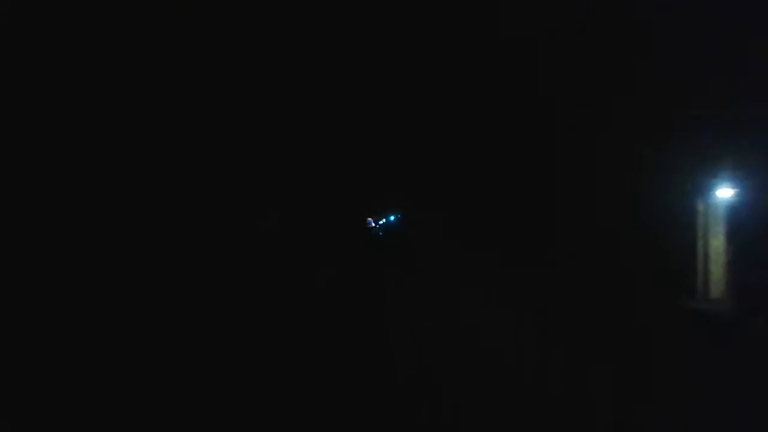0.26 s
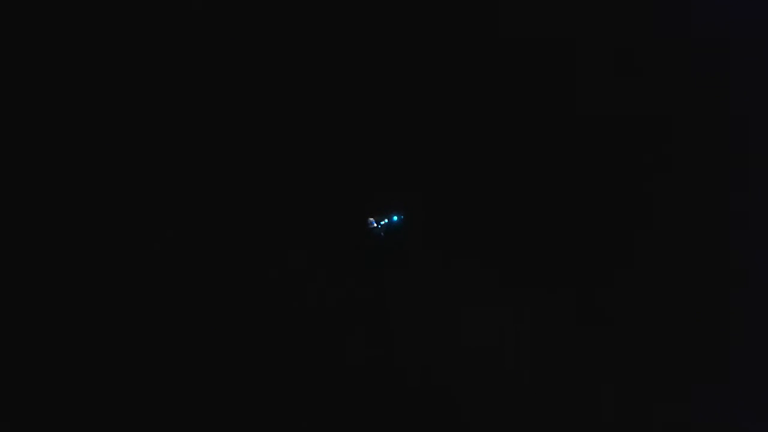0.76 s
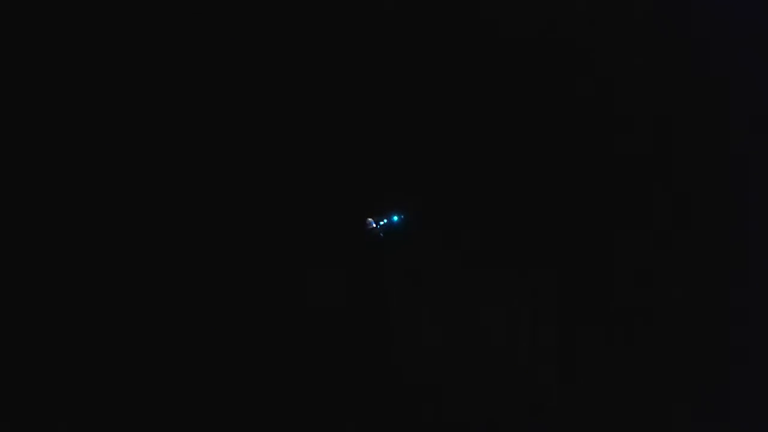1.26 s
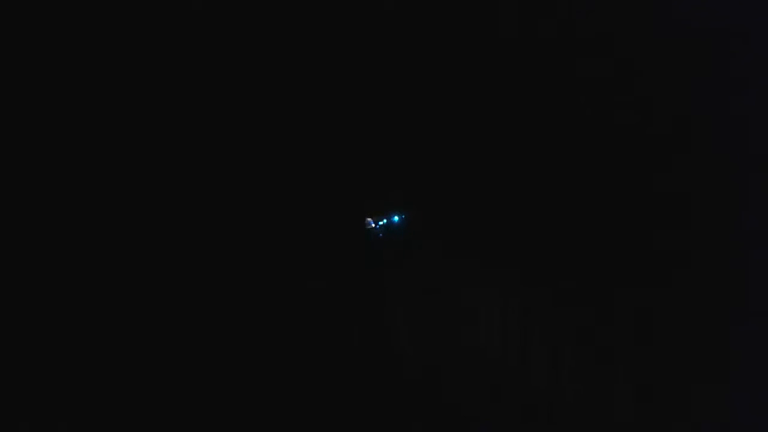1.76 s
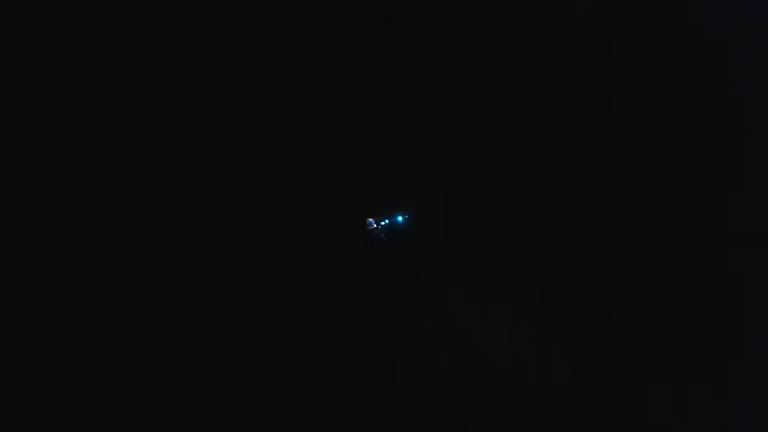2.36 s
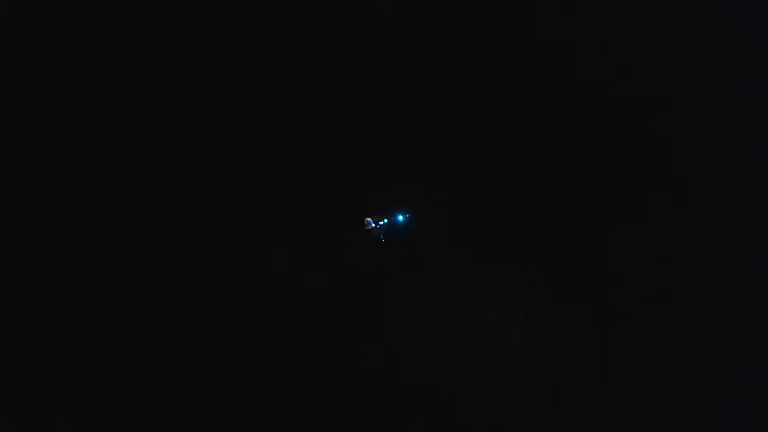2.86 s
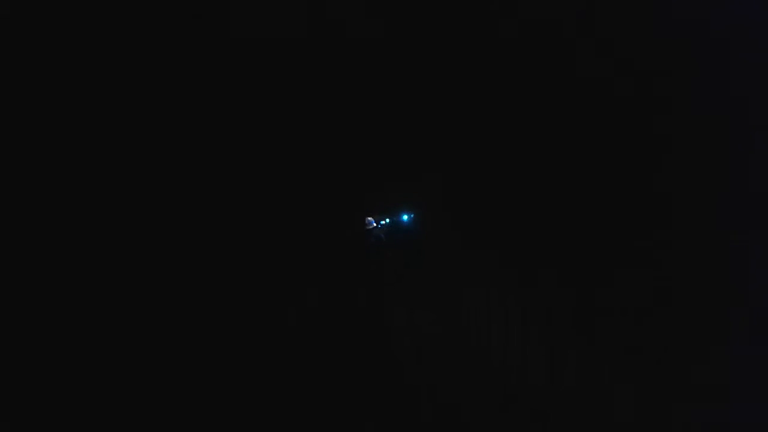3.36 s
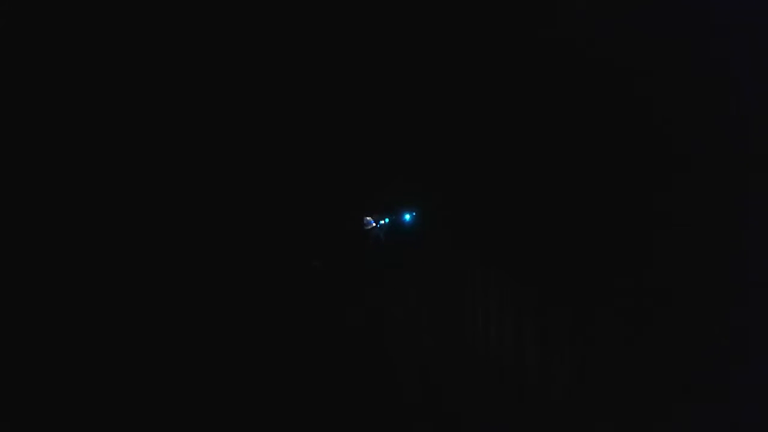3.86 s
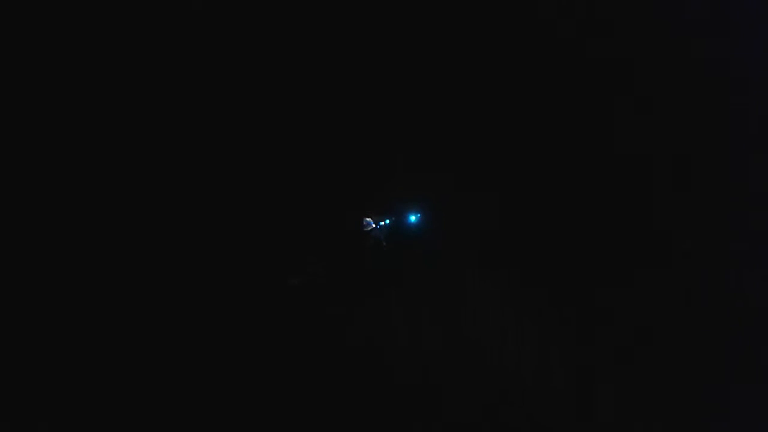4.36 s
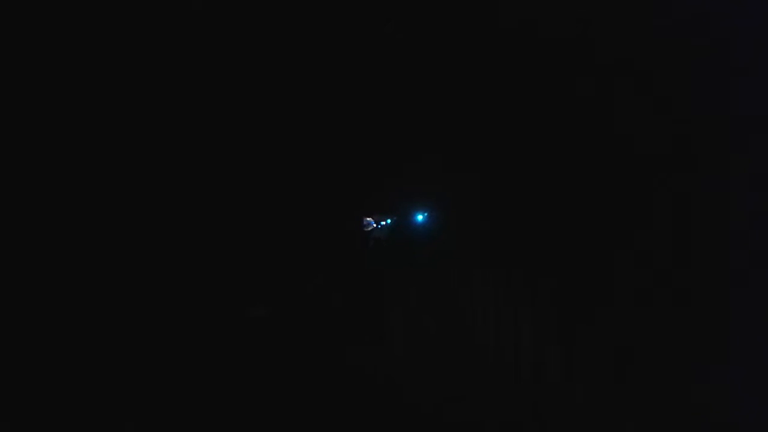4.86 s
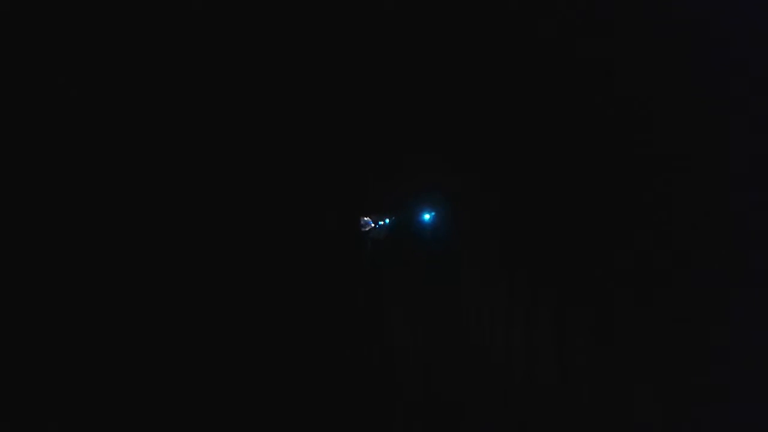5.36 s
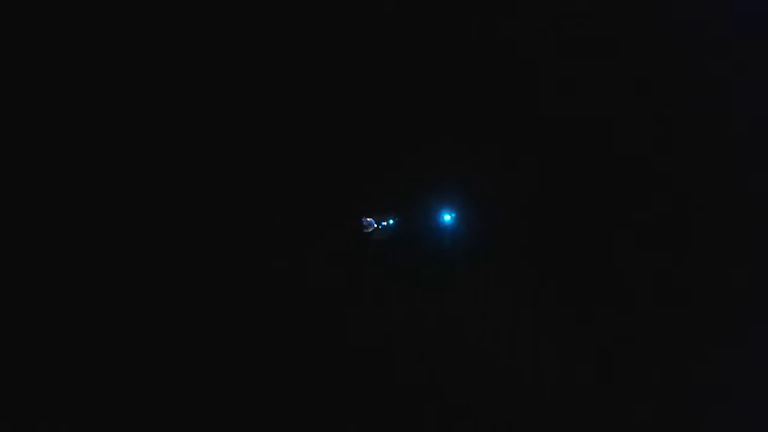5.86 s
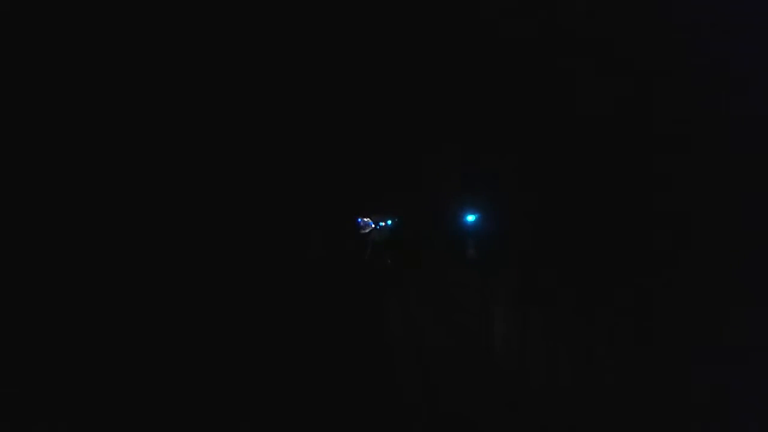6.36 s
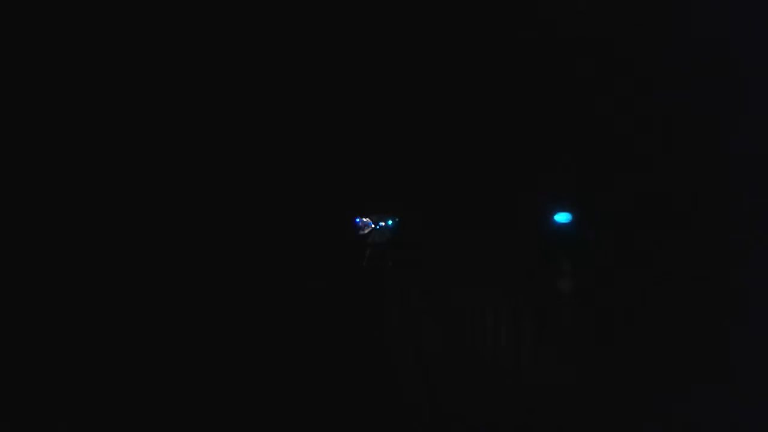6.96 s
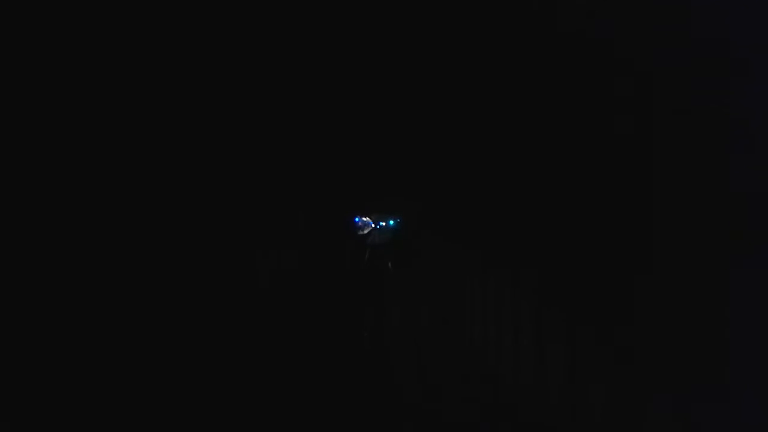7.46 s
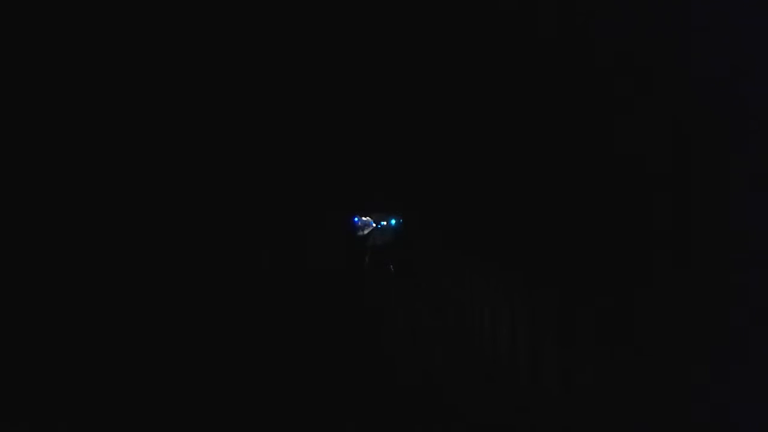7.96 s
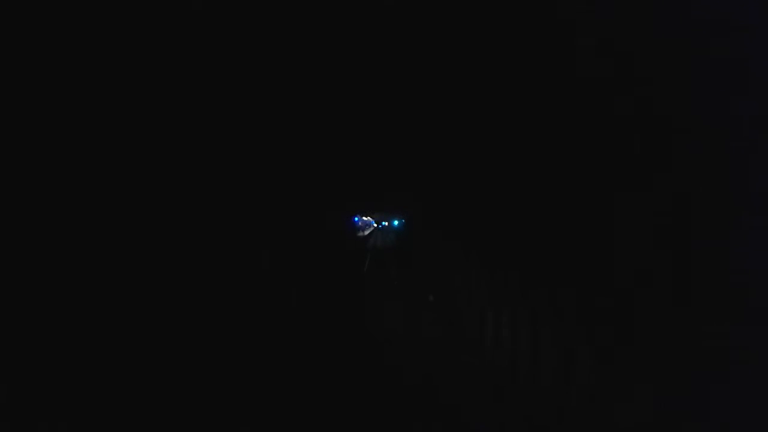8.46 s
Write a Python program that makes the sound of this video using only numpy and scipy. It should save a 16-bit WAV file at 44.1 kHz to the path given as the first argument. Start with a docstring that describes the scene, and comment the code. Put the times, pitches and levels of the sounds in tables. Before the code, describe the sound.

A subway car runs through a tunnel for nearly nine seconds, heard from inside. A loud, steady mix of low floor boom, body rumble and wheel roar fills the whole stretch, with irregular rail joint knocks and dull thuds. Much quieter, the power shoe hisses and crackles on the live rail, and a thin, high motor whine settles within the first second, when a fitting gives a tiny squeak. Just after 2 seconds the shoe spits in a few sharp clicks. Near 3.3 seconds a hollow panel gives a short bong, followed by more knocks. The wheels knock hardest between 4.5 and 5.5 seconds. Loose metal clinks lightly near 6.3 seconds, and the floor booms near 7.3. More knocks and spits cluster around 8 seconds, while the rumble carries on to the end.

```python
"""Inside a subway car in a tunnel. From the start, rough rails make the floor boom, the body rumble and
the wheels roar, while the shoe that picks up power hisses on the live rail. The drive's whine settles
in the first second, as a fitting squeaks. Just after 2 s the shoe spits hard; near 3.3 s a hollow panel
bongs. Wheels knock over rail joints all along, hardest around 5 s. Loose metal clinks near 6.3 s, the
floor booms near 7.3 s, and more knocks and spits come around 8 s."""
import sys
import numpy as np
from scipy import signal
from scipy.fft import rfft, irfft, next_fast_len
from scipy.io import wavfile
from scipy.ndimage import uniform_filter1d

SR = 44100
rng = np.random.default_rng(int(sys.argv[2]) if len(sys.argv) > 2 else 0)


def wav_out(sig):
    """Save sig, one row per channel (or a flat mono array), as 16-bit PCM at SR to the path in sys.argv[1]."""
    wavfile.write(sys.argv[1], SR, np.round(np.clip(np.atleast_2d(sig).T, -1, 1) * 32767).astype(np.int16))


N = 384111

# How loud the ride is: t/s, then level/dB of floor boom, body drone, panel rumble, wheel roar
RIDE_LEVELS = [(0.0, -53, -26, -21, -19.5), (0.07, -16, -14.5, -19.5, -27.5), (0.19, -41, -22, -28.5, -26),
               (0.29, -24, -22.5, -23.5, -26), (0.63, -20.5, -13.5, -16.5, -20.5),
               (1.19, -26, -18.5, -18.5, -21), (1.75, -21.5, -16, -18, -21),
               (2.33, -22.5, -14.5, -19, -20.5), (2.6, -24, -21, -21, -23.5), (3.05, -22, -16, -21, -23),
               (3.25, -20, -19, -20.5, -22.5), (3.42, -27, -19, -17, -20), (4.07, -20, -18.5, -21, -23),
               (5.34, -21.5, -17.5, -16.5, -20), (6.18, -21, -17.5, -17, -20), (6.72, -18, -13.5, -14, -19),
               (6.89, -16.5, -20, -17.5, -22), (7.25, -25.5, -15.5, -17.5, -20.5),
               (7.28, -11, -12, -22.5, -22.5), (7.35, -22.5, -19, -15, -23), (7.71, -17, -15, -16, -21),
               (8.66, -19.5, -17.5, -16.5, -21), (8.71, -32, -25, -12.5, -21.5)]
# Their colours (how strong each pitch is, from low to high): f/Hz, level/dB
BOOM_COLOUR = [(18, -40), (30, -26), (54, 6), (90, 0.5), (120, -10), (200, -120)]
DRONE_COLOUR = [(53, -32), (90, -4.5), (135, 1.5), (200, -2.5), (260, -22), (440, -120)]
RUMBLE_COLOUR = [(120, -35), (200, -1.5), (274, -0.5), (307, -3), (382, -4), (421, -11.5), (476, -7.5),
                 (500, -12), (650, -67), (1100, -120)]
ROAR_COLOUR = [(260, -20.5), (450, -1.5), (541, -4), (809, -4.5), (1090, -11.5), (1310, -13.5),
               (1690, -22.5), (2600, -32), (3380, -72), (5720, -120)]

def rolling(bumps):
    """Rough rails shake the floor, the body, the panels and the wheels."""
    boom_db, drone_db, rumble_db, roar_db = over_time(RIDE_LEVELS)
    boom = undb(boom_db) * flutter(BOOM_COLOUR, bumps, bump_db=.1, own_db=.73, rate=4.2, grain_db=.1)
    drone = undb(drone_db) * flutter(DRONE_COLOUR, bumps, bump_db=.21, own_db=.57, rate=4.4, grain_db=.13)
    rumble = undb(rumble_db) * flutter(RUMBLE_COLOUR, bumps, bump_db=1, own_db=.68, rate=12, grain_db=.3)
    roar = undb(roar_db) * flutter(ROAR_COLOUR, bumps, bump_db=.7, own_db=.73, rate=16, grain_db=.84)
    return boom + drone + lull() * (rumble + roar + ringing(rumble_db, roar_db))


# The notes of a panel, the rail and the body: f/Hz, width/Hz
RING_NOTES = [(385, 20.5), (1370, 145), (2000, 210)]

def ringing(rumble_db, roar_db):
    """A panel, the rail and the body ring along with the ride, most of all after a knock."""
    fade_s = 0.43  # every fade time is the time to fall by 60 dB
    struck = signal.lfilter([1], [1, -undb(-60 / (fade_s * SR))], knock_spikes())
    struck = uniform_filter1d(struck, size=441)  # soften each start
    steady_db = (rumble_db - 12, roar_db - 22, roar_db - 23)
    struck_db = (-22.5, -31.5, -35)  # after a knock of 0 dB
    out = 0
    for db, knock_db, note in zip(steady_db, struck_db, RING_NOTES):
        strength = undb(db + 2 * wander(7.6)) + undb(knock_db) * struck
        out += strength * narrow_noise(*note)
    return out


# Knocks at rail joints: t/s, level/dB, brightness/(dB per octave)
JOINT_KNOCKS = [(0.179, -8.5, -6), (0.248, -15, -7), (0.414, -14.5, 8), (1.055, -20, -3), (1.27, -14, 7),
                (1.485, -9, 2), (1.567, -17, 1), (1.682, -10.5, 7), (2.211, -8, 9), (2.249, -16, 12),
                (2.416, -9, 4.5), (2.816, -8.5, -5), (3.243, -13, 0), (3.419, -11, -4), (3.452, -15, 3),
                (3.535, -8, -2), (3.599, -15, -3), (4.51, -7.5, -9), (4.545, -4.5, -6), (4.58, -11, -3),
                (4.676, -9, -10), (4.922, -18, -3), (4.972, -3, -5), (5.035, -9.5, 7.5), (5.169, -6, -4),
                (5.404, -4, 2), (5.589, -8.5, -6), (5.647, -15, 0), (5.839, -13.5, 4), (6.279, -19, 6),
                (6.475, -10.5, 2), (7.548, -7, -5), (7.98, -8, -5), (8.184, -10.5, -7), (8.24, -11, -1)]
# The colour of a knock: f/Hz, level/dB
KNOCK_COLOUR = [(300, -2), (500, 5.5), (750, 7.5), (1000, 3), (1400, -4.5), (2200, -21), (4000, -47),
                (6000, -70)]

def knocks():
    """A wheel hits a rail end with a short ping, and the knock rings on in the body and the tunnel."""
    hits = [(s, db, 0.77, tilt_db) for s, db, tilt_db in JOINT_KNOCKS]  # 0.77 s fade
    clatter = bursts(hits, KNOCK_COLOUR, rise_s=0.0012, crest_db=13, snap=0.35)
    t = np.arange(SR // 50) / SR
    ping = undb(-4.5) * np.exp(-t / 0.0047) * np.sin(2 * np.pi * 720 * t)
    return clatter + signal.fftconvolve(knock_spikes(), ping)[:N]


def knock_spikes():
    """One spike for each knock, as tall as the knock is strong."""
    spikes = np.zeros(N)
    for s, db, _ in JOINT_KNOCKS:
        spikes[int(s * SR)] = undb(db)
    return spikes


def lull(depth_db=-2.5, lead_s=0.13):
    """Weight comes off a wheel as it nears a joint: the volume sags, more before a harder knock."""
    ramp = np.linspace(0, 1, int(lead_s * SR))
    nearness = signal.fftconvolve(knock_spikes(), ramp)[len(ramp) - 1:]
    return undb(depth_db * nearness)


# Thuds of the wheel frame: t/s, level/dB, brightness/(dB per octave)
FRAME_THUDS = [(0.071, -10, 3.5), (0.545, -5, -2), (0.68, -9, -4), (1.028, -0.5, -1.5), (1.429, -0.5, -9),
               (3.264, -0.5, 2), (3.318, -6.5, 1), (3.5, -6, 4), (4.149, -3.5, 5.5), (4.374, -3, -2),
               (4.62, -4, 3), (5.404, -4, 4), (5.843, -7, 4), (6.45, -5, 0), (6.72, -3.5, -9),
               (7.28, -8, -2), (8, -8, 4), (8.329, -6.5, -7)]
# The colour of a thud: f/Hz, level/dB
THUD_COLOUR = [(60, -19), (130, 7), (250, 0.5), (420, -9.5), (700, -23), (1200, -88)]

def thuds():
    """The frame that holds the wheels bumps into the car body, which rings on."""
    hits = [(s, db, 0.57, tilt_db) for s, db, tilt_db in FRAME_THUDS]  # 0.57 s fade
    return bursts(hits, THUD_COLOUR, rise_s=0.0032, crest_db=8.5, snap=0.5)


# How loud the shoe is: t/s, scrape level/dB, sizzle level/dB
SHOE_LEVELS = [(0.0, -45.5, -42), (0.58, -40.5, -39.5), (1.16, -41.5, -38.5), (2.25, -38.5, -35.5),
               (2.6, -44, -39), (3.27, -42, -38), (3.49, -40, -36.5), (4.0, -42.5, -39), (4.34, -42.5, -38),
               (4.75, -40, -37.5), (5.31, -41.5, -37), (5.6, -35.5, -35.5), (6.11, -41, -38.5),
               (6.53, -37.5, -36), (6.84, -41.5, -40), (8.03, -42, -40), (8.2, -38.5, -38.5),
               (8.71, -40.5, -37.5)]
# When it spits: t/s, level/dB, fade/s, brightness/(dB per octave)
SHOE_SPITS = [(.635, -28, .4, 2), (.675, -27, 0.32, -2), (.79, -29, .3, 1), (.829, -24, .1, 4),
              (.912, -27, .15, 0), (1.15, -25.5, .25, 0), (1.33, -19.5, 0.22, -7), (1.478, -25, 0.21, -2),
              (1.566, -24, 0.31, -6), (1.69, -20, .15, 0), (2.028, -26, 0.3, 10), (2.057, -16.5, 0.18, 4),
              (2.094, -20, 0.13, 2), (2.203, -13, 0.34, 9), (2.23, -15, 0.23, 2), (2.265, -21, 0.33, 0),
              (2.308, -20, .12, -1), (2.405, -24, 0.35, 1), (3.29, -24, .2, -2), (3.36, -23, .22, 8),
              (3.39, -26, 0.27, 7), (3.435, -21.5, .5, -6.5), (3.475, -25, 0.46, -4),
              (3.525, -25, 0.46, -4), (3.6, -25, 0.45, -6), (4.545, -24, 0.33, 2), (4.56, -16, .3, -11),
              (4.975, -29, 0.6, 2), (5.16, -21, 0.18, -7), (5.405, -20.5, 0.44, -1), (5.836, -23, 0.12, 8),
              (6.274, -28, .22, -14), (6.398, -23.5, .1, -2), (6.545, -25, .15, -3),
              (7.55, -26.5, 0.23, -1), (7.98, -29, .26, 11), (8.04, -25, 0.5, -3), (8.125, -24, .35, -4),
              (8.204, -24.5, 0.4, -2), (8.245, -24, 0.32, -6), (8.285, -23, .2, -9), (8.63, -22, 0.13, 2)]
# The colours of its three sounds: f/Hz, level/dB
SCRAPE_COLOUR = [(1530, -17), (2600, -1.5), (2890, -2), (3090, -3), (4570, -6.5), (6000, -6), (7800, -23),
                 (13200, -120)]
SIZZLE_COLOUR = [(4500, -15), (6000, -7), (6800, 2), (7800, 4), (8800, -1.5), (10600, -4.5), (11100, -10.5),
                 (11600, -44), (13000, -90)]
SPIT_COLOUR = [(880, 0), (1500, -5.5), (3190, -5.5), (3860, -4), (5580, -6), (7800, 2), (11700, -12.5),
               (15200, -45), (22000, -120)]

def shoe(bumps):
    """The power shoe scrapes, sizzles and spits as it slides along the live rail."""
    scrape_db, sizzle_db = over_time(SHOE_LEVELS)
    scrape = flutter(SCRAPE_COLOUR, bumps, bump_db=1.23, own_db=.88, rate=15, grain_db=.99)
    sizzle = flutter(SIZZLE_COLOUR, bumps, bump_db=1.15, own_db=.94, rate=18, grain_db=.97)
    spits = bursts(SHOE_SPITS, SPIT_COLOUR, rise_s=0.012, crest_db=7)
    return lull() * undb(scrape_db) * scrape + undb(sizzle_db) * sizzle + spits


# Squeaks of a fitting and bongs of a panel: t/s, level/dB, f/Hz, swell time/s
FITTING_SQUEAKS = [(.880, -25, 9100, 0.004), (.896, -35, 9250, .004), (.906, -34, 9000, .008)]
PANEL_BONGS = [(0.545, -10, 150, .012), (0.585, -9.5, 135, .02), (1.448, -10, 165, .018),
               (1.545, -12, 169, .012), (1.06, -15.5, 290, 0.048), (3.278, -2, 259, 0.0087),
               (3.297, -5, 160.5, 0.011), (4.57, -13, 432, 0.012), (5.42, -12, 417, .02),
               (5.89, -15, 394, 0.03), (8.0, -9, 371.4, 0.027)]

def squeaks_and_bongs():
    """A loose fitting squeaks and a hollow panel is struck: short tones that swell and fade."""
    t = np.arange(N) / SR
    out = np.zeros(N)
    for s, db, hz, swell_s in [*FITTING_SQUEAKS, *PANEL_BONGS]:
        swell = np.exp(-((t - s) / swell_s) ** 2)
        out += undb(db) * swell * np.sin(2 * np.pi * hz * t)
    return out


# Clinks of loose metal: t/s, level/dB, f/Hz
METAL_CLINKS = [(.613, -36, 5100), (.703, -35, 7000), (.834, -30, 7000), (2.234, -33, 3930),
                (5.689, -41, 4600), (5.842, -35, 4570), (6.274, -25, 1950), (6.276, -38, 4190),
                (6.324, -25, 1850), (7.554, -38, 4100), (8.639, -35, 3000)]

def clinks(fade_s=0.07, width_hz=180):
    """Loose metal is struck and rattles around one note as it dies away."""
    out, t = np.zeros(N + SR), np.arange(SR // 10) / SR
    for s, db, hz in METAL_CLINKS:
        start = int(s * SR)
        out[start:start + len(t)] += undb(db - 60 * t / fade_s) * narrow_noise(hz, width_hz, len(t))
    return out[:N]


# The tones of the drive: multiple of the switching frequency, multiple of the motor frequency
STRONG_TONES = [(2, 0), (5, -9), (5, -3), (5, 3), (5, 9), (6, -12), (6, -6), (4, 12)]
FAINT_TONES = [(4, -4), (5, -11), (5, 15), (6, 2), (7, -15), (6, 12)]
# How loud the whine is: t/s, then level/dB of each strong tone
WHINE_LEVELS = [(0.0, -50, -52, -56.0, -55, -53, -53.0, -59.0, -60.0),
                (0.35, -49.0, -48, -52.0, -47.0, -44, -54.0, -53.0, -59.0),
                (0.7, -50.0, -48, -56.0, -50.0, -45.0, -53.0, -56.0, -53.0),
                (1.05, -48, -49.0, -55.0, -48.0, -47.0, -45.0, -60.0, -48),
                (1.4, -52, -47, -49.0, -51.0, -45.0, -45, -53.0, -51.0),
                (1.75, -48.0, -50.0, -53.0, -47.0, -46.0, -45.0, -51.0, -50.0),
                (2.05, -48.0, -43, -51.0, -45, -44.0, -40, -46.0, -49.0),
                (2.35, -48, -54.0, -60.0, -52.0, -49.0, -52.0, -56.0, -52.0),
                (2.7, -50, -44.0, -53.0, -48.0, -45.0, -44.0, -49.0, -55.0),
                (3.05, -48, -49.0, -49.0, -49.0, -46.0, -44.0, -51.0, -50),
                (3.35, -50, -59.0, -57.0, -59.0, -47.0, -53, -54.0, -54.0),
                (3.7, -50.5, -46.0, -59.0, -47, -49.0, -46.0, -45.0, -60.0),
                (4.1, -50.0, -47, -52.0, -51.0, -46.0, -42, -53.0, -52.0),
                (4.5, -49, -60.0, -53.0, -56.0, -51.0, -45.0, -54.0, -53.0),
                (4.85, -46.5, -53.0, -60.0, -51.0, -44, -45.0, -54.0, -50),
                (5.2, -49.0, -51.0, -60.0, -51.0, -44.0, -47.0, -56.0, -51.0),
                (5.5, -46, -43, -54.0, -50.0, -49.0, -47.0, -49.0, -58.0),
                (5.8, -51.0, -49, -57.0, -56.0, -54, -53.0, -57.0, -60.0),
                (6.1, -50.0, -43.0, -46, -45, -55.0, -48.0, -47.0, -60.0),
                (6.4, -53.0, -50, -53.0, -56.0, -51.0, -51.0, -52.0, -60.0),
                (6.75, -60.0, -60.0, -55.0, -55.0, -51.0, -48.0, -58.0, -60.0),
                (7.1, -54, -51.0, -55.0, -49, -52.0, -55, -60.0, -60.0),
                (7.4, -54.0, -54, -52.0, -55.0, -49, -43, -51.0, -59.0),
                (7.7, -52, -46, -55.0, -56.0, -55.0, -51.0, -49.0, -58.0),
                (8.0, -52, -47, -59.0, -53.0, -49.0, -52.0, -53.0, -57.0),
                (8.35, -51.0, -45.0, -44, -57.0, -50.0, -46.0, -53.0, -60.0),
                (8.7, -57, -51.0, -50, -53.0, -55.0, -47.0, -49.0, -57.0)]

def drive():
    """The electronics that feed the motor whine in many tones, with a thin hiss around the lowest."""
    levels = over_time(WHINE_LEVELS)
    strong = sum(whine(*tone, db, waver_db=1.5) for tone, db in zip(STRONG_TONES, levels))
    faint = sum(whine(*tone, db=-60, waver_db=3) for tone in FAINT_TONES)
    hiss = undb(levels[0] - 2.5) * narrow_noise(2900, width_hz=120)
    return strong + faint + hiss


def whine(switch_multiple, motor_multiple, db, waver_db):
    """One wavering tone, its pitch set by the switching and by the motor, which speeds up at first."""
    switch_hz, motor_hz = 1464.87, 58.42
    speedup_hz_per_s, speedup_ends_s = 4.6, 0.82
    t = np.arange(N) / SR
    motor_turns = np.cumsum(motor_hz - speedup_hz_per_s * np.maximum(speedup_ends_s - t, 0)) / SR
    turns = switch_multiple * switch_hz * t + motor_multiple * motor_turns
    turns += rng.random() + 0.026 * wander(25)
    return np.sqrt(2) * undb(db + waver_db * wander(14)) * np.sin(2 * np.pi * turns)


def undb(db):
    """Turn decibels into a number to multiply by."""
    return 10 ** (np.asarray(db) / 20)


def over_time(table):
    """Join a table's points with straight lines: one curve for each level column."""
    times, *levels = np.transpose(table)
    return [np.interp(np.arange(N) / SR, times, level) for level in levels]


def wander(rate):
    """A smooth random curve, roughly between -1 and 1, with `rate` new values a second."""
    hold = int(SR / rate)
    steps = np.repeat(rng.standard_normal(N // hold + 1), hold)
    return 1.3 * uniform_filter1d(uniform_filter1d(steps, hold), hold)[:N]


def paint(noise, colour, tilt_db=0.):
    """Give noise a colour, brighter by tilt_db each octave, at an average strength (rms) of 1."""
    hz, db = np.transpose(colour)
    size = next_fast_len(len(noise))
    octave = np.log2(np.maximum(np.arange(size // 2 + 1) * SR / size, 1))
    gain = undb(np.interp(octave, np.log2(hz), db, left=-240) + tilt_db * octave)
    painted = irfft(rfft(noise, size) * gain, size)[:len(noise)]
    return painted / np.sqrt(np.mean(painted ** 2))


def flutter(colour, bumps, bump_db, own_db, rate, grain_db):
    """Grainy noise whose half-octave bands flicker partly with the track bumps, partly on their own."""
    grains = rng.standard_normal(N) * undb(grain_db * wander(400))
    size = next_fast_len(N)
    spectrum = rfft(paint(grains, colour), size)
    half_octave = 2 * np.log2(np.maximum(np.arange(len(spectrum)) * SR / size, 1))
    lowest, highest = int(2 * np.log2(colour[0][0])), int(2 * np.log2(colour[-1][0]))
    out = 0
    for centre in range(lowest, highest + 2):
        band = irfft(spectrum * np.clip(1 - abs(half_octave - centre), 0, 1), size)[:N]
        out += band * undb(bump_db * bumps + own_db * wander(rate))
    return out / np.sqrt(np.mean(out ** 2))


def bursts(rows, colour, rise_s, crest_db, snap=0.):
    """Puffs of noise that rise and die away, turned down by crest_db to allow for their peaks."""
    out, t = np.zeros(N + SR), np.arange(SR // 2) / SR
    for s, db, fade_s, tilt_db in rows:
        shape = np.minimum(t / rise_s, 1) * undb(-60 * np.maximum(t - rise_s, 0) / fade_s)
        shape *= 1 + snap * np.exp(-t / 0.0077)  # a hard first contact
        noise = paint(rng.standard_normal(len(t)), colour, tilt_db)
        start = int(s * SR)
        out[start:start + len(t)] += undb(db - crest_db) * shape * noise
    return out[:N]


def narrow_noise(hz, width_hz, samples=N):
    """Noise that rings around one pitch, at an average strength of 1."""
    noise = signal.lfilter(*signal.iirpeak(hz, hz / width_hz, SR), rng.standard_normal(samples))
    return noise / np.sqrt(np.mean(noise ** 2))


def scene():
    """Everything at one microphone; the same track bumps shake the wheels and the shoe."""
    bumps = wander(15)
    fittings = squeaks_and_bongs() + clinks()
    return (rolling(bumps) + knocks() + thuds() + shoe(bumps) + drive() + fittings)[None]


def record(dry, top_hz=11800):
    """The microphone rounds off the loudest peaks, and the highest treble is cut."""
    rounded = np.tanh(0.96 * dry) / 0.93
    return signal.sosfilt(signal.ellip(10, .2, 80, top_hz, fs=SR, output="sos"), rounded)


dry = scene()
out = record(dry)
wav_out(out)
```